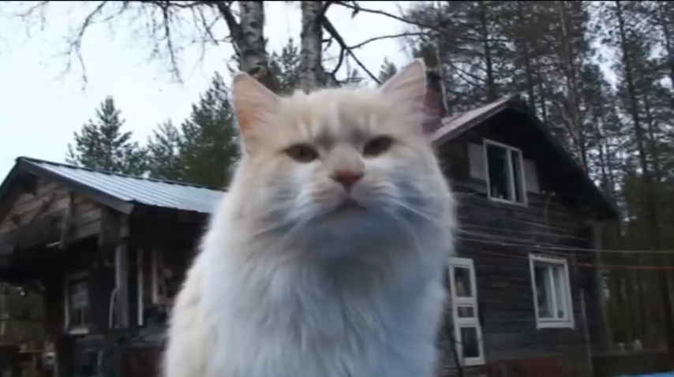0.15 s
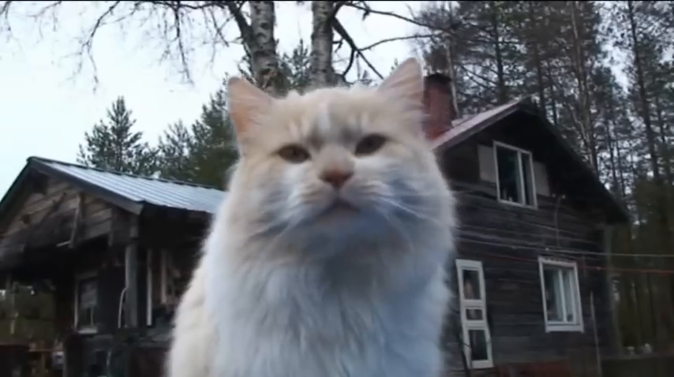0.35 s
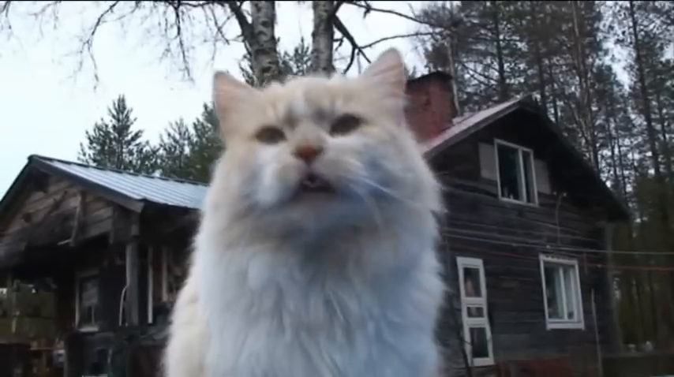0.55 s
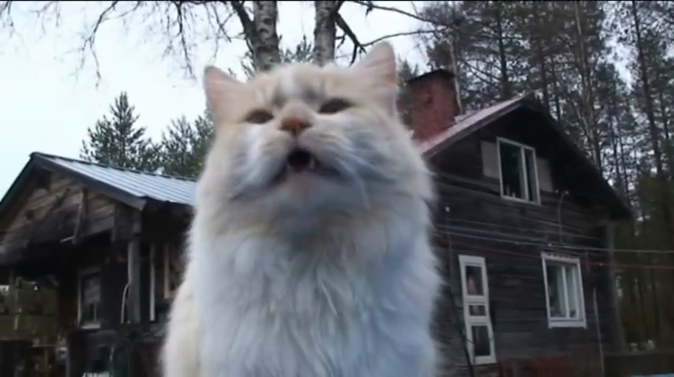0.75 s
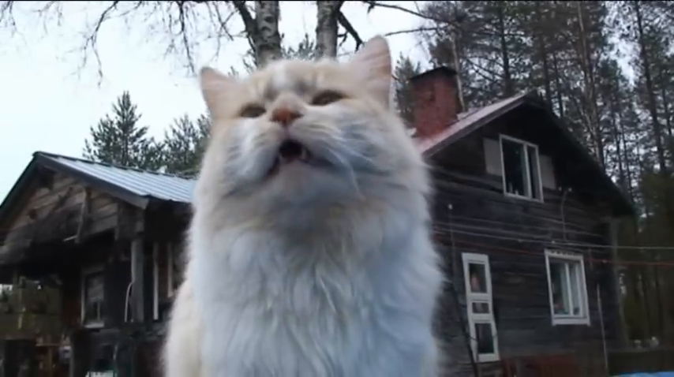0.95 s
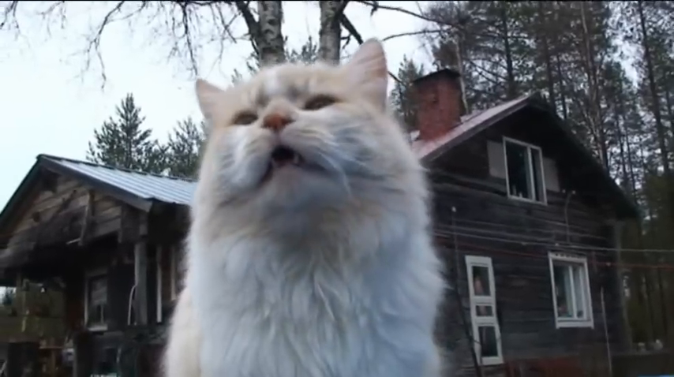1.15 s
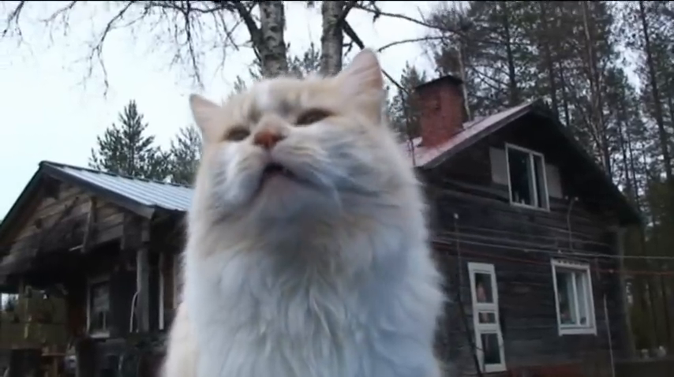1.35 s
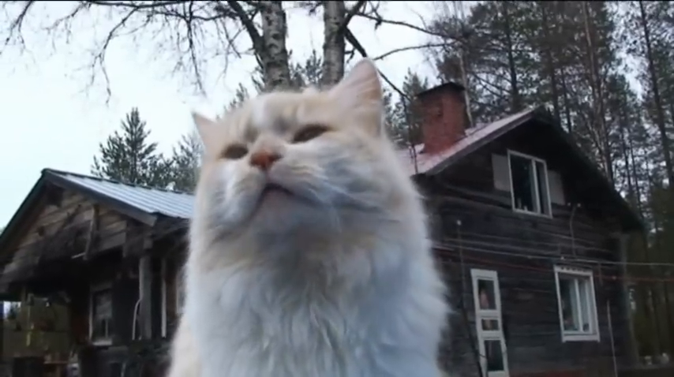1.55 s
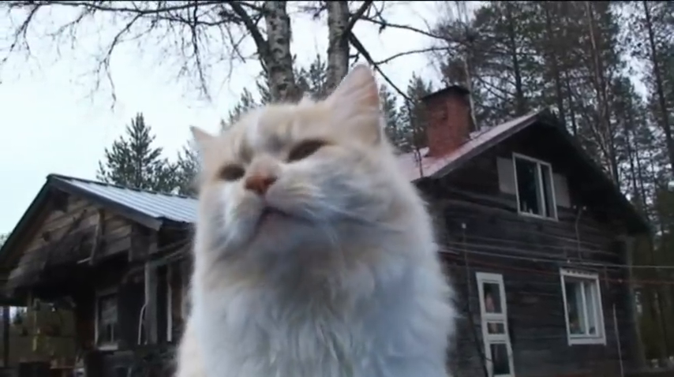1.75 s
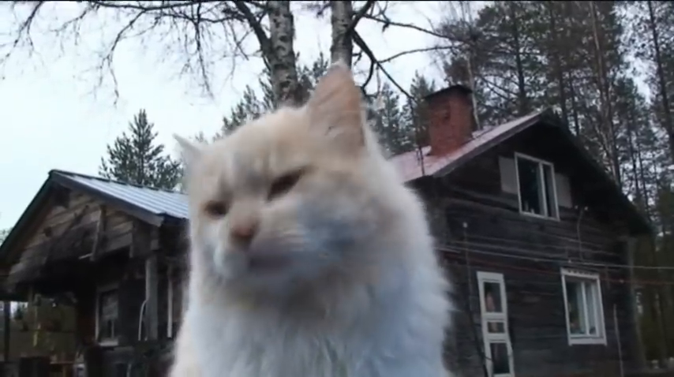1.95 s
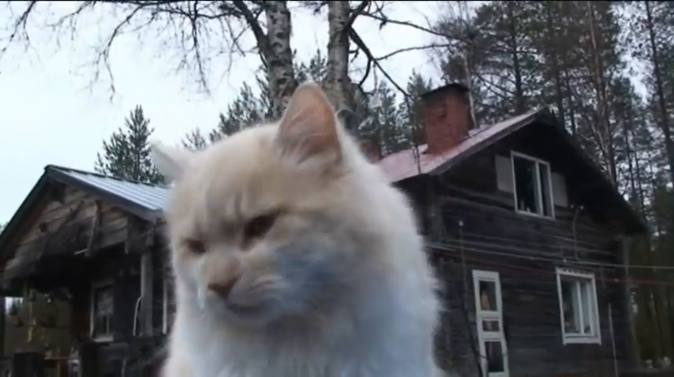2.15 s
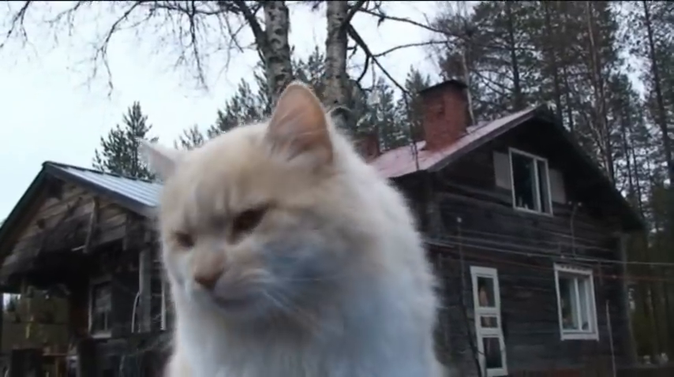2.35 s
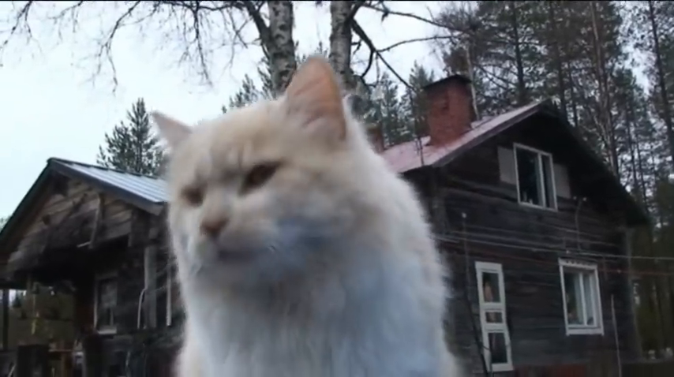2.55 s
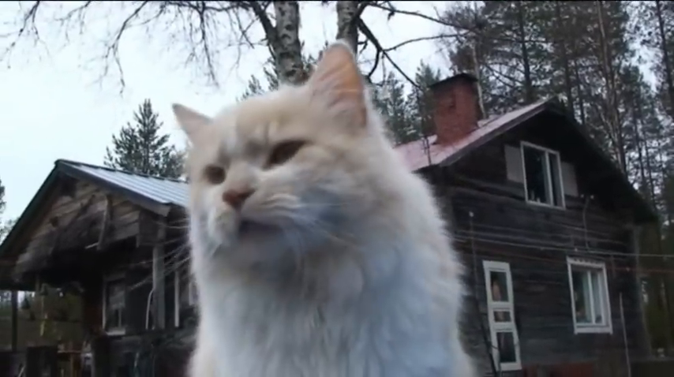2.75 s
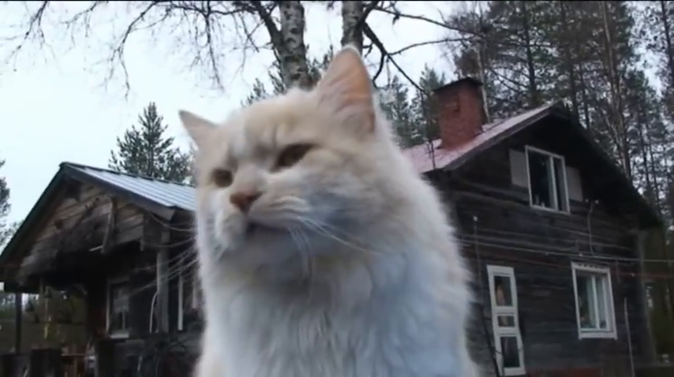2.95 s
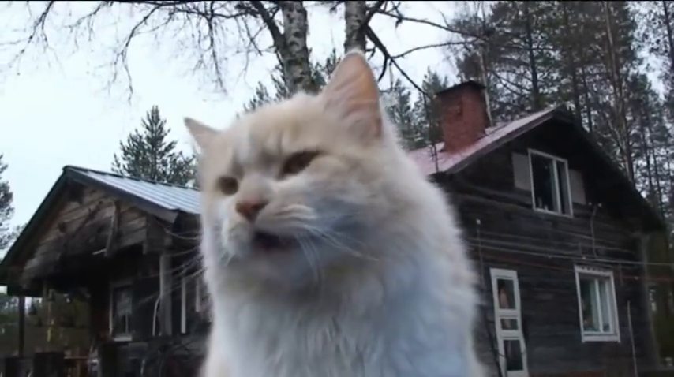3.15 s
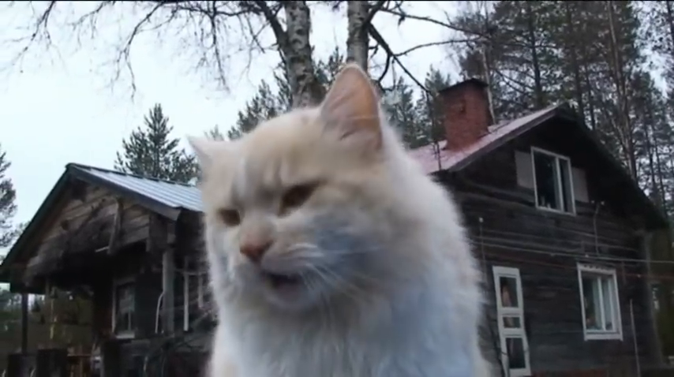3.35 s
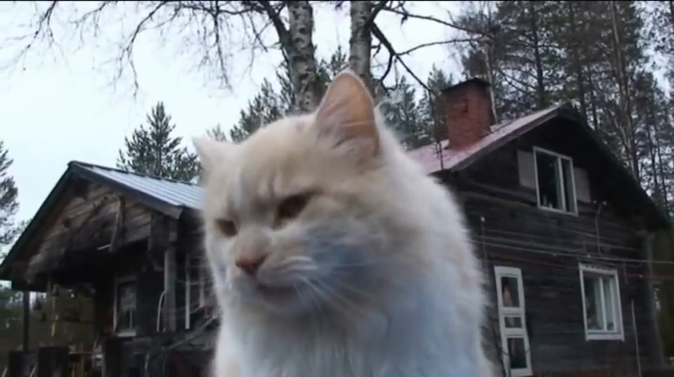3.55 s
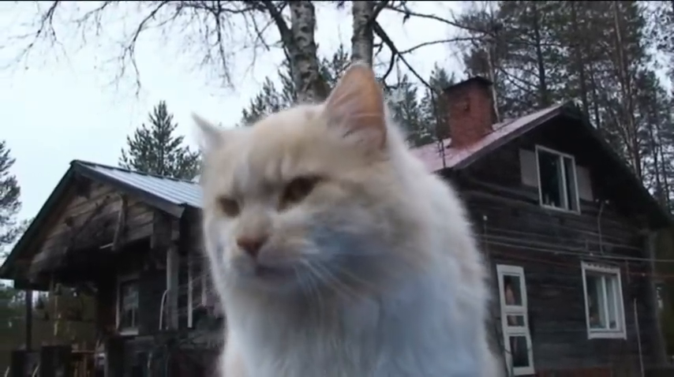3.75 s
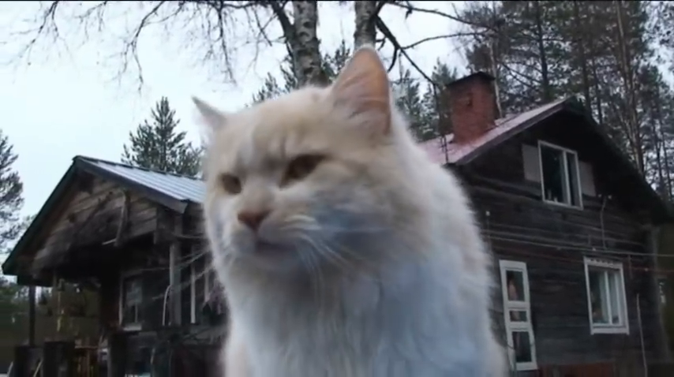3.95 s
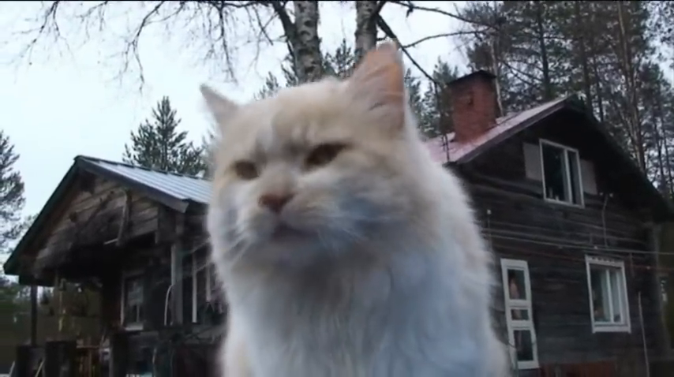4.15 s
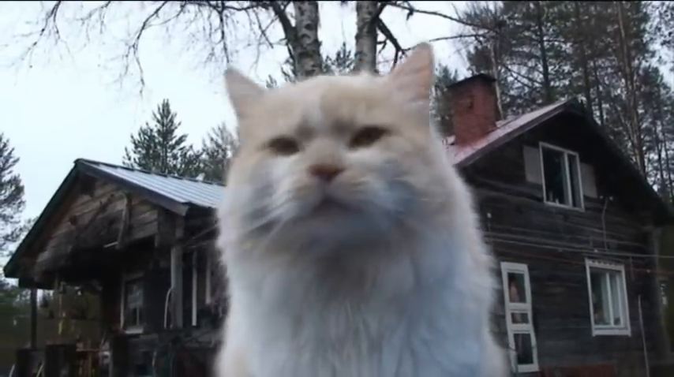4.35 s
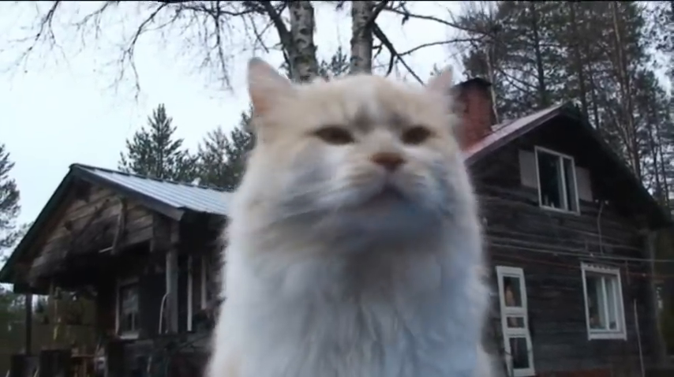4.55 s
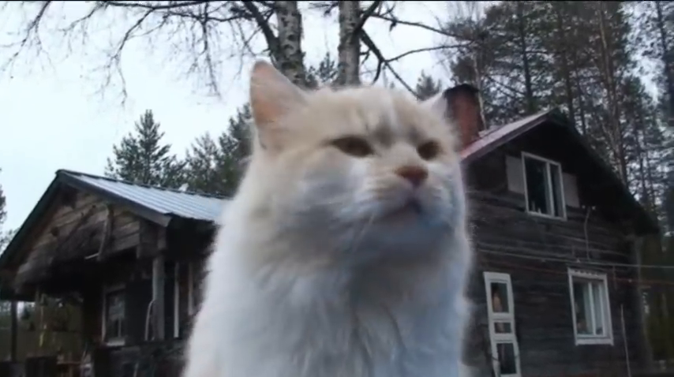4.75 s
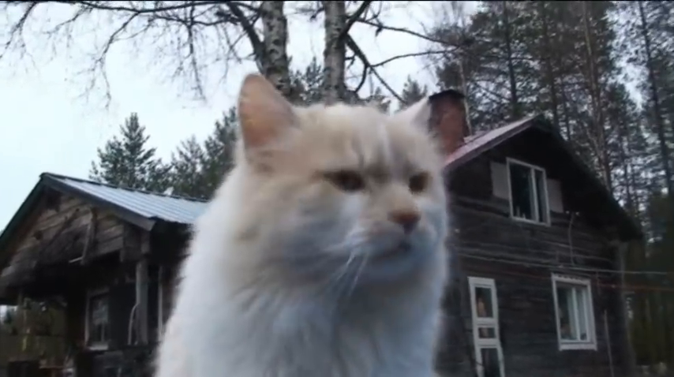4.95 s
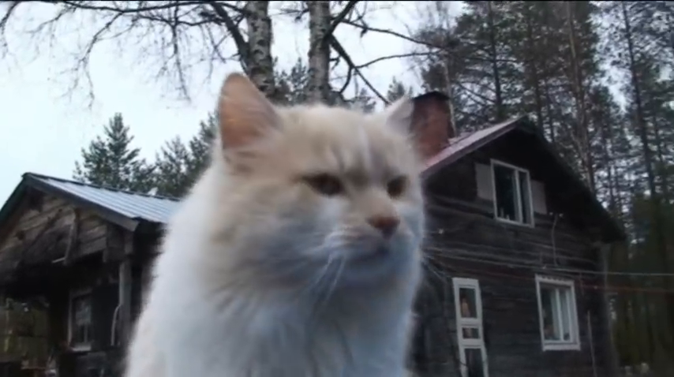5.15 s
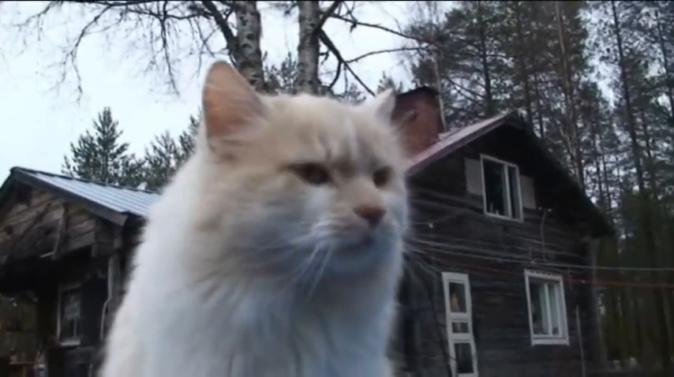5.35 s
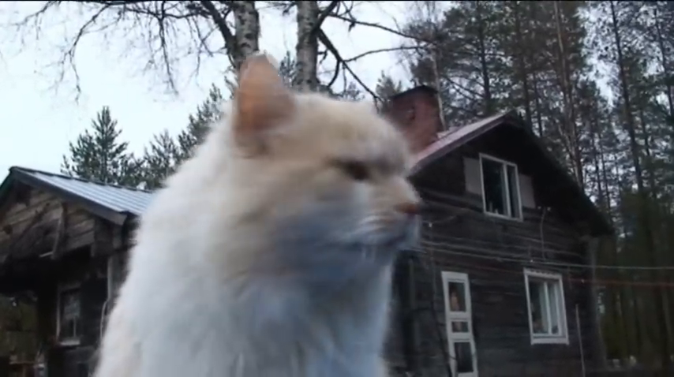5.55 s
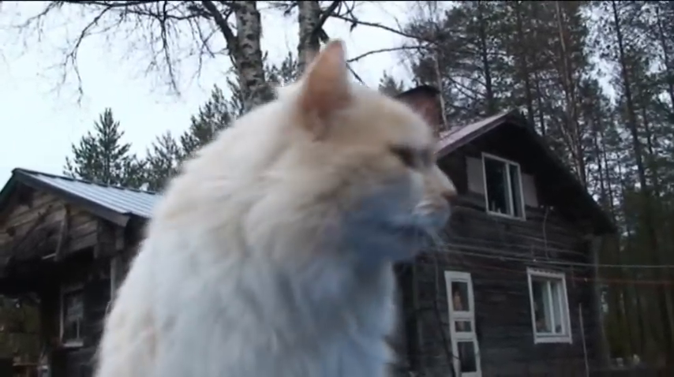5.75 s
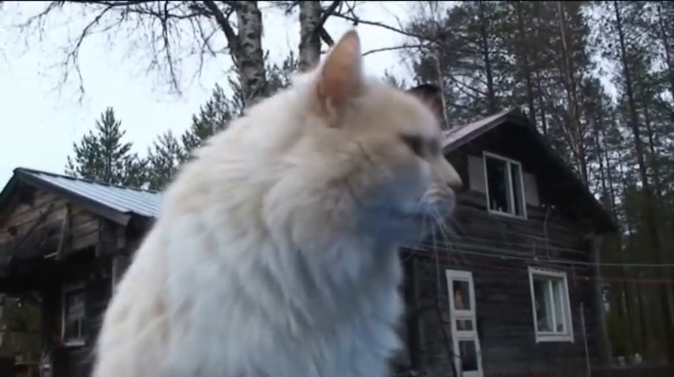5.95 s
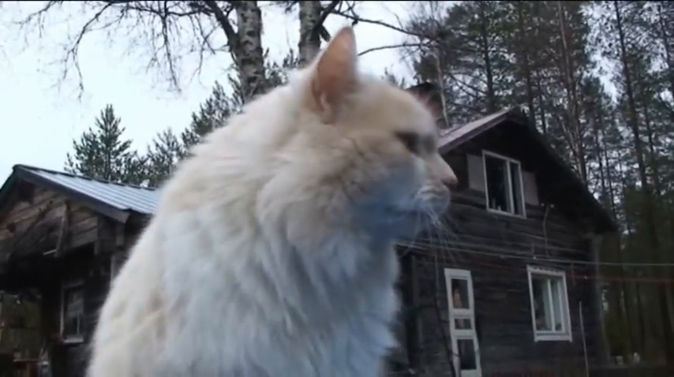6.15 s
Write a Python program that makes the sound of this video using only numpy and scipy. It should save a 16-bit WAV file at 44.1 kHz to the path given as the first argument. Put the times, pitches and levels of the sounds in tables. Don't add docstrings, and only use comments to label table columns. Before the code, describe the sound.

Dry open air, small hand-held stereo camera, quiet low hum leaning left, thin whine, soft hiss and deep wind rumble throughout. At 0 s fingers rub briefly and tick on the casing; a hard, boomy knock lands at 0.08 s on the left and its low sway fades. At 0.67 s a wet mouth smack opens the first meow, about 0.75 to 1.45 s: thin, high, rising from roughly 750 to 1100 Hz then sagging, with cracks and rasps; lips close at 1.5 s with a faint breathy whistle. Small left knocks and a wind swell near 1.9-2 s. A smack at 2.9 s, then the second meow from 3.03 to 3.63 s stutters in and flutters; gusts flap at 3.4 and 3.85 s. A faint tick at 4.6 s, soft lip sounds from 5.2 s. The third meow, 5.55-6.19 s, rises and thins out, with heavy wind flaps around 5.7-5.8 s.

```python
import sys
import numpy as np
from scipy import signal
from scipy.fft import rfft, irfft
from scipy.io import wavfile
from scipy.ndimage import uniform_filter1d

SR = 44100
rng = np.random.default_rng(int(sys.argv[2]) if len(sys.argv) > 2 else 0)


def convert_level_to_amplitude(level_db):
    exponent = np.asarray(level_db, float) / 20
    return 10 ** exponent


def transcribe(signal):
    frames = np.atleast_2d(signal).T
    limited = np.clip(frames, -1, 1)
    pcm = np.round(limited * 32767).astype(np.int16)
    wavfile.write(sys.argv[1], SR, pcm)


N = 277830
T = np.arange(N) / SR


def level(x, db):
    return x * convert_level_to_amplitude(db) / np.sqrt(np.mean(x ** 2))


def pan(x, db):
    return x * convert_level_to_amplitude(np.array([[db], [-db]]) / 2)


def band(lo_hz, hi_hz, channels=1):
    sos = signal.butter(2, [lo_hz, hi_hz], "band", fs=SR, output="sos")
    return level(signal.sosfilt(sos, rng.standard_normal((channels, N))), 0)


def walk(rate):
    k = int(SR / rate)
    smooth = uniform_filter1d(rng.standard_normal(N), k)
    return level(uniform_filter1d(smooth, k), 0)


def gate(rows, edge_s):
    return sum(convert_level_to_amplitude(db) * np.clip(np.minimum(T - start, stop - T) / edge_s + .5, 0, 1)
               for start, stop, db in rows)


def bump(s, width_s):
    return np.exp(-((T - s) / width_s) ** 2)


def warble(rows, drift, rate, edge_s):
    turns = 2 * np.pi * np.cumsum(1 + drift * walk(rate)) / SR
    return sum(gate([(start, stop, db)], edge_s) * np.sin(hz * turns) for start, stop, db, hz in rows)


def add(out, s, db, pan_db, modes, rise_s):
    t = T[:int(SR * max(t60 for hz, gain_db, t60 in modes))]
    crest_s = 1.8 * rise_s
    ring = sum(convert_level_to_amplitude(gain_db) * np.cos(2 * np.pi * hz * (t - crest_s)) * 1000 ** (-t / max(t60, 1e-3))
               for hz, gain_db, t60 in modes)
    ring = ring * (1 - np.exp(-(t / rise_s) ** 2))
    i = int(s * SR)
    out[:, i:i + len(ring)] += pan(ring * convert_level_to_amplitude(db) / abs(ring).max(), pan_db)[:, :N - i]


# [f/Hz, rms level/dB]
DRIVE_LINES = [(150.7, -60.5), (899.0, -79), (2099, -81.5), (2702, -82), (4500, -89), (5098, -100),
               (5399, -109), (5701, -90), (6002, -88), (6901, -91), (7800, -92)]
# [f/Hz, density/dB per Hz]
HISS_COLOUR = [(100, -6.5), (172, -2.5), (209, -6), (500, -8), (1440, -13.5), (2730, -18), (7850, -20.5),
               (15500, -22.5)]


def camera():
    (hum_hz, hum_db), *whine = DRIVE_LINES
    hum_turns = np.cumsum(hum_hz * (1 + 0.011 * walk(10.2))) / SR
    hum = convert_level_to_amplitude(hum_db + 0.53 * walk(8.8)) * np.sin(2 * np.pi * hum_turns)
    steady = whine + [(15625, -92)]
    lines = sum(convert_level_to_amplitude(db) * np.sin(2 * np.pi * hz * T + k) for k, (hz, db) in enumerate(steady))
    hz, db = np.transpose(HISS_COLOUR)
    colour = convert_level_to_amplitude(np.interp(np.log(np.fft.rfftfreq(N, 1 / SR) + 1), np.log(hz), db))
    white = rng.standard_normal((2, N)) + 0.54 * rng.standard_normal(N)
    hiss = level(irfft(rfft(white) * colour, N), -55.5)
    return np.sqrt(2) * (pan(hum, 7.5) + pan(lines, 8.5)) + hiss


# [t/s, half length/s, deep level/dB, puff level/dB]
SWELLS = [(.3, 0.18, -53, -81), (0.642, .04, -67, -57), (0.91, 0.056, -69, -54.5), (1.203, .05, -76, -61),
          (1.952, 0.074, -49, -51.5), (2.29, .05, -62, -75), (3.453, 0.073, -65, -56),
          (3.555, 0.07, -52, -59), (3.698, 0.092, -61, -57.5), (4.027, 0.078, -60, -54.5),
          (5.785, 0.13, -59, -56)]
# [start t/s, stop t/s, level/dB, f/Hz]
GUSTS = [
    (3.40, 3.46, -38, 72.4),
    (3.84, 3.88, -43.5, 75.7),
    (5.708, 5.725, -36.5, 75),
    (5.725, 5.76, -52, 72),
    (5.76, 5.78, -32, 68.3),
    (5.785, 5.82, -39, 79),
]


def wind():
    gusty_db = 3.5
    deep_gain = convert_level_to_amplitude(-62.5 + gusty_db * walk(6.6))
    puff_gain = convert_level_to_amplitude(-64 + gusty_db * walk(25))
    for s, half_s, deep_db, puff_db in SWELLS:
        swell = bump(s, half_s)
        deep_gain = deep_gain + convert_level_to_amplitude(deep_db) * swell
        puff_gain = puff_gain + convert_level_to_amplitude(puff_db) * swell
    deep = band(40.2, 58, channels=2) * deep_gain
    lowest = band(16.2, 28.4, channels=2) * convert_level_to_amplitude(-59 + 2.1 * walk(8.7))
    puff = level(.5 * band(35.0, 106, channels=2) + band(56.0, 103.4), 0.11) * puff_gain
    return deep + lowest + puff + warble(GUSTS, 0.0558, 24.2, 0.019)


# [t/s, dull level/dB, bright level/dB]
RUB = [
    (0.0, -47, -53),
    (0.038, -49.5, -44.5),
    (0.052, -53, -61),
    (0.06, -57, -60),
]
# [t/s, peak level/dB, f/Hz, left minus right/dB]
TICKS = [
    (0.0303, -37.5, 3270, -3),
    (0.0812, -44, 2370, 5),
    (0.179, -46, 3300, 6),
    (3.6494, -53, 2380, 3),
    (4.5994, -49.5, 3000, 3),
]
# [t/s, shell peak level/dB, shell left minus right/dB, sway peak level/dB]
KNOCKS = [
    (.047, -46, -1, -31),
    (.081, -17.5, 9.5, -48),
    (.1355, -50, 5, -38),
    (1.906, -44.5, 18, -61),
    (1.939, -38, 12, -52),
    (1.992, -38.5, 14, -60),
]
# [f/Hz, level/dB, t60/s]
SHELL_MODES = [(88, -8, .25), (125, -5, .05), (165, -1, .07), (230, 0, .09), (330, -18, .04),
               (430, -15, .06), (560, -13, .06), (680, -16, .04)]
# [f/Hz, level/dB, t60/s]
SWAY_MODES = [(47.5, 0, 1.0), (90, -6, .6)]
# [t/s, level/dB, t60/s]
TREMOR = (.047, -34, 0.65)


def hands():
    s, dull_db, bright_db = np.transpose(RUB)
    slide = band(280, 1500, channels=2) * convert_level_to_amplitude(np.interp(T, s, dull_db))
    slide = slide + band(1200, 4500, channels=2) * convert_level_to_amplitude(np.interp(T, s, bright_db))
    crosstalk = 0.3 * slide[::-1]
    out = pan((slide + crosstalk) * convert_level_to_amplitude(0.45 * walk(300)) * (T < .048), -2.5)
    for s, db, hz, pan_db in TICKS:
        add(out, s, db, pan_db, [(hz, 0, .02), (0.89 * hz, -5, .015)], .0003)
    for s, shell_db, pan_db, sway_db in KNOCKS:
        shell = np.zeros((2, N))
        add(shell, s, shell_db, pan_db, SHELL_MODES, .0025)
        out += [shell[0], np.roll(shell[1], int(.0007 * SR))]
        add(out, s, sway_db, -5, SWAY_MODES, .003)
    s, db, t60 = TREMOR
    return out + band(23, 135, channels=2) * convert_level_to_amplitude(db) * (T > s) * 1000 ** (-(T - s) / t60)


# [t/s, peak level/dB, low mode f/Hz, high mode f/Hz, high mode level/dB]
SMACKS = [
    (0.674, -26, 1320, 2120, 2.5),
    (1.494, -35, 780, 1710, -13),
    (2.903, -33, 1286, 1880, 1.5),
    (5.236, -46.5, 760, 2080, -6),
    (5.482, -49, 974, 2200, 19),
    (5.584, -44, 1192, 1560, 7),
    (5.609, -45, 1350, 1470, 2),
    (6.138, -47.5, 950, 1800, 13),
]


def smacks():
    out = np.zeros((2, N))
    spit = band(600, 10500)[0]
    t60, crack_db, crack_s = 0.024, -24, 0.0011
    for s, db, low_hz, high_hz, high_db in SMACKS:
        modes = [(low_hz, 0, t60), (high_hz, high_db, 0.61 * t60),
                 (0.95 * high_hz, high_db - 19.0, 0.8 * t60), (6100, -18, .012)]
        add(out, s, db, 3.5, modes, .00025)
        crack = spit * convert_level_to_amplitude(db + crack_db) * (T > s) * np.exp(-abs(T - s) / crack_s)
        out = out + pan(crack, 8.5)
    return out


# [t/s, pitch f/Hz, level/dB, mouth opening as overtones over fundamental/dB]
MEOWS = [
    [(0.784, 755, -46.5, -12), (0.806, 848, -45, -6.5), (0.838, 947, -49.5, 8.5), (0.88, 1026, -50, 2),
     (1.0, 1066, -52, 2.5), (1.17, 1096, -51, -2.5), (1.3, 1030, -51, -1.5), (1.42, 992, -50.5, -8.5),
     (1.45, 924, -62, -16)],
    [(3.03, 650, -47, -12), (3.088, 746, -41, -13), (3.136, 835, -43.5, -17), (3.192, 922, -44.5, -4.5),
     (3.31, 969, -47.5, 1.5), (3.424, 1039, -48.5, 2.5), (3.52, 1018, -48.5, -2), (3.616, 954, -49, -2.5),
     (3.64, 910, -56, -6)],
    [(5.611, 601, -55, -4), (5.669, 757, -42, -1), (5.715, 834, -44, -4.5), (5.78, 925, -48, -5),
     (5.93, 1083, -53, 2), (5.975, 996, -53, 0), (6.037, 1030, -52.5, -7.5), (6.09, 970, -51, -15),
     (6.19, 918, -54.5, -29)],
]
# [start t/s, stop t/s, level/dB]
VOICED = [
    (.735, .774, -13),
    (.775, 1.445, 2.5),
    (3.033, 3.041, -4),
    (3.057, 3.072, -2),
    (3.09, 3.103, -0.8),
    (3.116, 3.628, 2),
    (5.551, 5.584, -1),
    (5.589, 6.19, 2),
]
# [start t/s, stop t/s, level/dB]
HALVED = [(.868, .876, -50), (.942, .948, -44.5), (1.159, 1.168, -54), (1.17, 1.19, -60),
          (1.205, 1.26, -57), (1.265, 1.292, -53), (1.398, 1.44, -54.5)]
# [t/s, width/s, pitch
# jump share, upper overtone dip/dB, dip delay/s]
TWITCHES = [(.737, .01, -.08, -3, 0), (.762, .01, .04, -3, 0), (.869, .0032, .16, -8, .005),
            (.881, .005, -.045, 3, 0), (.899, .0022, .09, -9, .003), (.908, .004, -.02, 0, 0),
            (.937, .004, .12, -12, .005), (.953, .0055, -.045, 4, 0), (1.153, .0031, .095, -10, .0048),
            (1.166, .0058, -.043, 1, 0), (1.198, .0036, .11, -3, .004), (1.283, .008, -.03, -6, 0),
            (3.18, .014, 0, -7, 0), (3.216, .006, .035, -10, .005), (.795, .006, 0, -4, 0),
            (5.592, .004, 0, -10, 0), (5.615, .007, 0, -12, 0), (5.627, .003, .06, 2, 0),
            (5.664, .011, .035, 2.5, .004), (5.942, .006, .02, 0, 0), (5.965, .01, -.015, 0, 0),
            (6.032, .0025, .08, -2, .0074), (6.04, .008, .025, 0, 0)]
# [t/s, pitch jump share]
FLUTTER = [(3.2, -.03), (3.245, .025), (3.27, -.015), (3.288, .015), (3.302, -.02), (3.325, .045),
           (3.342, -.015), (3.357, .035), (3.372, -.015), (3.385, .03), (3.403, -.025), (3.42, .025),
           (3.47, .012), (3.51, .012), (3.59, .02)]
# [left minus right/dB, high throat resonance start f/Hz, end f/Hz, its level/dB, breath level/dB]
HEAD = [(3.5, 5800, 6600, -19, -19), (4.5, 6000, 5860, -20, -22), (2.5, 5700, 6200, -36, -28)]
# [lips part t/s, start f/Hz, end f/Hz, level over voice/dB, width/Hz]
MOUTH = [(.78, 3170, 3050, -12.5, 445), (3.15, 3380, 3500, -10.5, 950), (5.71, 3380, 3330, -11.5, 630)]
# [f/Hz, level/dB]
SIDE_THROAT = [(2200, -29), (4950, -27), (9750, -22)]


def fold_motion():
    beats = [(s, .007, share, -85 * max(share, 0), .016) for s, share in FLUTTER]
    moves = TWITCHES + beats
    jump = sum(share * bump(s, width_s) for s, width_s, share, db, lag_s in moves)
    dip_db = sum(db * bump(s + lag_s, width_s) for s, width_s, share, db, lag_s in moves)
    wobble = 1 + jump + .005 * (walk(160) + 0.4 * walk(42))
    sway_db = [(.2, 1.2, .45)[min(k, 3) - 1] * dip_db + min(k - .5, 2.5) * .8 * walk(80)
               for k in range(1, 11)]
    return wobble, sway_db


def voice():
    out = np.zeros((2, N))
    voiced, halved = gate(VOICED, 0.0025), gate(HALVED, 0.0021)
    wobble, sway_db = fold_motion()
    half_db = 1.9 * walk(90)
    haze = band(1300, 3600)[0] + convert_level_to_amplitude(-6) * band(7000, 14000)[0]
    glide_s = 0.018
    closed_share = 0.8
    part_s, tire_db = 0.073, -8
    high_width_hz = 380
    for rows, head, mouth in zip(MEOWS, HEAD, MOUTH):
        pan_db, start_hz, end_hz, high_db, breath_db = head
        part_at, mouth_start_hz, mouth_end_hz, mouth_db, mouth_width_hz = mouth
        s, *columns = np.transpose(rows)
        now = (T > s[0] - .07) & (T < s[-1] + .01)
        t, ends = T[now], s[[0, -1]]
        hz, level_db, open_db = (np.interp(t, s, column) for column in columns)
        hz = uniform_filter1d(hz, int(glide_s * SR)) * wobble[now]
        phase = 2 * np.pi * np.cumsum(hz) / SR
        effort_db = level_db + closed_share * np.minimum(open_db, 0)
        high_hz = np.interp(t, ends, [start_hz, end_hz])
        mouth_hz = np.interp(t, ends, [mouth_start_hz, mouth_end_hz])
        parted = np.clip((t - part_at) / part_s + .5, 0, 1) * convert_level_to_amplitude(np.interp(t, ends, [0, tire_db]))
        overtone_db = [level_db, level_db + open_db]
        for k in range(3, 11):
            lift = sum(convert_level_to_amplitude(db) * np.exp(-((k * hz - f) / high_width_hz) ** 2)
                       for f, db in [(high_hz, high_db)] + SIDE_THROAT)
            mouth_lift = convert_level_to_amplitude(mouth_db) * np.exp(-((k * hz - mouth_hz) / mouth_width_hz) ** 2)
            lift = lift + parted * mouth_lift
            overtone_db.append(effort_db + 20 * np.log10(lift + convert_level_to_amplitude(-87)))
        tones = sum(convert_level_to_amplitude(db + sway_db[k - 1][now]) * np.sin(k * phase - k * k)
                    for k, db in enumerate(overtone_db, 1))
        half = np.sin(1.5 * phase) + convert_level_to_amplitude(-18) * np.sin(3.5 * phase) + convert_level_to_amplitude(-13) * np.sin(phase / 2)
        half = convert_level_to_amplitude(half_db[now]) * half
        air = (haze + convert_level_to_amplitude(-5) * band(start_hz - 500, end_hz + 400)[0])[now]
        air = air * (1 + np.sin(phase)) * convert_level_to_amplitude(effort_db + breath_db)
        sung = voiced[now] * (tones + air) + halved[now] * half
        out[:, now] += pan(-np.sqrt(2) * sung, pan_db)
    return out


# [start t/s, stop t/s, level/dB, f/Hz]
WHISTLES = [
    (.776, .798, -52.5, 2220),
    (1.498, 1.63, -67.5, 2890),
    (3.615, 3.662, -64, 4370),
    (5.65, 5.68, -64, 5400),
    (5.72, 5.74, -69, 5620),
    (5.965, 6.0, -68, 3960),
    (6.14, 6.185, -67, 3730),
]


def whistles():
    return pan(warble(WHISTLES, 0.0048, 37, 0.011), 2.5)


# [start t/s, stop t/s, level/dB]
RASPS = [
    (.865, .885, -55),
    (.932, .955, -52),
    (1.148, 1.21, -54.5),
    (1.395, 1.45, -58.5),
    (1.455, 1.56, -64),
    (3.03, 3.12, -61),
    (3.63, 3.72, -65.5),
    (5.58, 5.63, -68),
]


def rasps():
    return pan(band(530, 2370)[0] * convert_level_to_amplitude(2.3 * walk(170)) * gate(RASPS, .008), 4.1)


# [t/s, peak
# level/dB, f/Hz]
SKIPS = [(0.868, -38, 1900), (0.87, -34, 1720), (.901, -32, 1700), (0.935, -34, 1830), (0.9398, -29, 1570),
         (0.943, -37.5, 1390), (1.151, -35, 1680), (1.155, -33, 1520), (1.16, -33, 1388),
         (1.194, -36.5, 1820), (1.198, -42, 1460), (1.4, -40, 1650), (1.41, -39, 1640), (1.425, -38, 1560),
         (1.437, -47, 1754), (1.434, -39, 830), (2.966, -44, 754), (2.971, -45, 1410), (2.977, -57, 900),
         (3.682, -44.5, 890), (3.688, -54, 1420), (3.70, -55, 990), (5.586, -47, 2220), (5.609, -54, 2760),
         (6.031, -41.5, 1400)]


def skips():
    out = np.zeros((2, N))
    for s, db, hz in SKIPS:
        add(out, s, db, 3.5, [(hz, 0, .015), (1.1 * hz, -7, .015), (3900, -33, .01)], .0009)
    return out


def cat():
    out = smacks() + voice() + whistles() + rasps() + skips()
    out[0] = np.roll(out[0], shift=-2)
    return out


def scene():
    return camera() + wind() + hands() + cat()


def band_limit(x):
    return signal.sosfilt(signal.butter(12, 16180, fs=SR, output="sos"), x)


def record(dry):
    top_hz = 15745
    passed = np.fft.rfftfreq(N, 1 / SR) < top_hz
    mix = irfft(rfft(dry) * passed, N)
    return band_limit(mix)


dry = scene()
out = record(dry)
transcribe(out)
```